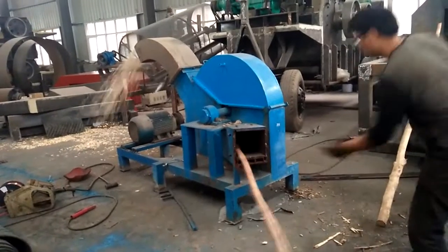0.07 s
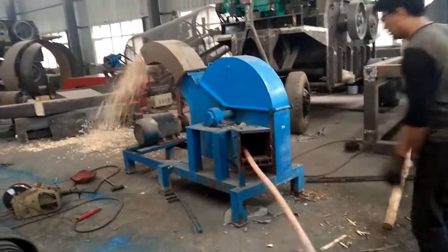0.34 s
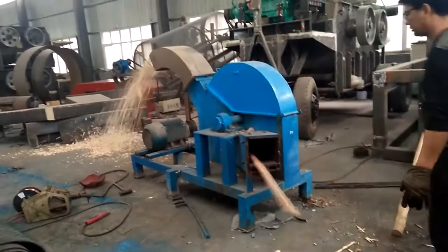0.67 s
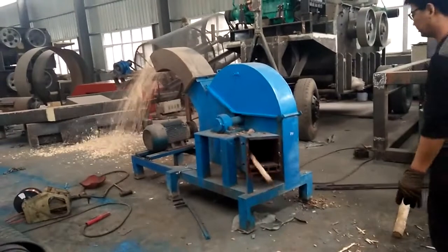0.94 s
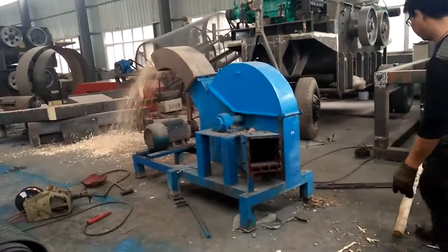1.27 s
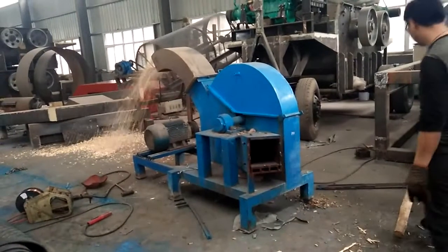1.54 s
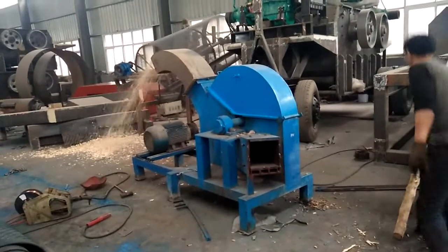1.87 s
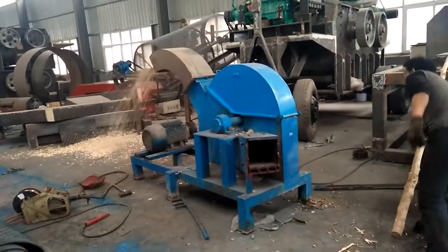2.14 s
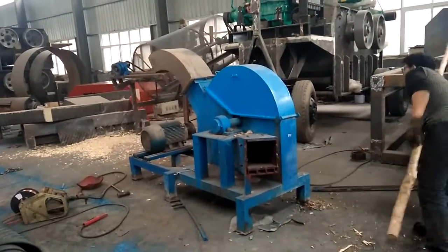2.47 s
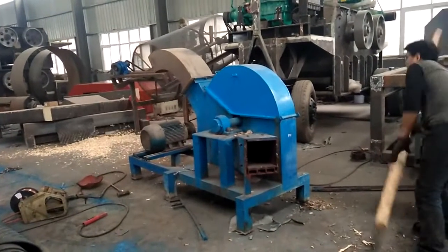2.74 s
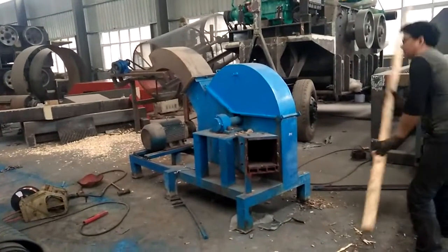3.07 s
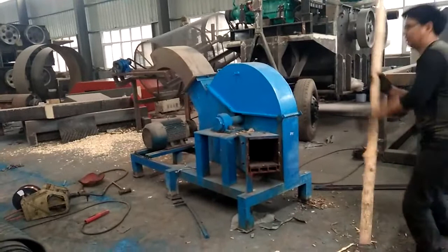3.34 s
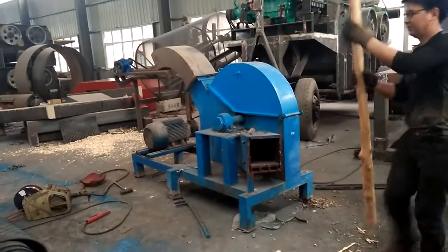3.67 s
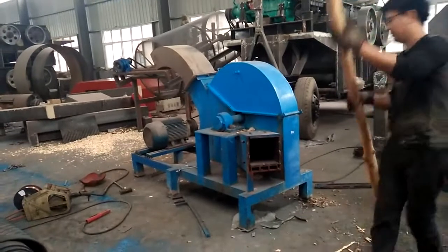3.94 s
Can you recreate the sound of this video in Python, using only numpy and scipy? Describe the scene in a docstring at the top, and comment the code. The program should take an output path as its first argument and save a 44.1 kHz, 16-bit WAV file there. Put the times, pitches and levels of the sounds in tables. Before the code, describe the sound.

A wood chipper roars as it grinds a pole and sprays chips, then runs empty with a quieter hum. Leftover wood clatters, knocks and squeaks against its steel housing, echoing in a large workshop.

```python
"""Wood chipper in a large workshop.

A belt-driven chipper grinds a pole: knives tear off splinters, the housing roars, chips spray out.
It runs empty after 1.7 s and idles with a rotor hum. Twice a leftover piece clatters round the steel
housing; loose chips rattle, wood squeaks, rasps and knocks, and a thin metallic rubbing sets in.
Mono except for the top treble."""
import sys
import numpy as np
from scipy import signal
from scipy.fft import rfft, irfft
from scipy.io import wavfile
from scipy.ndimage import uniform_filter1d, minimum_filter1d

SR = 44100
rng = np.random.default_rng(int(sys.argv[2]) if len(sys.argv) > 2 else 0)


def wav_out(sig):
    """Save sig, one row per channel (or a flat mono array), as 16-bit PCM at SR to the path in sys.argv[1]."""
    wavfile.write(sys.argv[1], SR, np.round(np.clip(np.atleast_2d(sig).T, -1, 1) * 32767).astype(np.int16))


N = 176400
T = np.arange(N) / SR
ROTOR_HZ, KNIVES = 37.93, 2
PANEL_LOW_HZ, PANEL_HIGH_HZ, PANEL_T60_S = 739, 2756, 0.43

# Envelopes. Each row: time in seconds, relative level in dB.
LOAD_ENVELOPE = [(0, -14), (.4, -13.5), (.9, -16), (1.3, -14), (1.68, -13.5), (1.85, -19.5), (2.0, -27),
                 (2.3, -31.5), (2.7, -33), (4, -36)]  # housing roar, standing for rotor load
BITE_ENVELOPE = [(0, -12.5), (.4, -12), (.72, -12), (.95, -16), (1.3, -19.5), (1.62, -21.5), (1.8, -21.5),
                 (2.0, -37), (2.5, -34.5), (4, -71)]  # knives in the pole
SPRAY_ENVELOPE = [(0, -24.5), (.4, -25), (.78, -25.5), (.92, -37.5), (1.04, -26), (1.45, -30),
                  (1.58, -27.5), (1.7, -30), (1.8, -40.5), (2.0, -61), (2.4, -83), (4, -88)]  # chips leaving the chute
STUB_ENVELOPE = [(0, -53), (1.45, -63), (1.66, -18.5), (1.8, -18.5), (1.95, -35), (2.4, -35.5), (2.8, -41),
                 (4, -70)]  # last stub tumbling through the knives
HUM_ENVELOPE = [(0, -15), (.9, -23), (1.55, -12), (2.2, -2.5), (2.7, 3), (3.2, -2.5), (4, -6.5)]  # low rotor harmonics

# Noise spectra. Each row: frequency in Hz, relative density in dB.
ROAR_SPECTRUM = [(30, -26), (80, -25), (160, -15), (230, -44.5), (370, -2), (680, -7.5), (800, 4),
                 (1250, 0.5), (1700, 1.5), (2600, -6.5), (5000, -29), (14000, -78)]
BITE_SPECTRUM = [(100, -38), (170, -7.5), (600, -26.5), (1100, -1), (1800, 1), (2400, 2), (3100, -2),
                 (4300, -6.5), (5200, -14.5), (14000, -48)]
SPRAY_SPECTRUM = [(1000, -1), (4000, -0.5), (5500, -2.5), (8000, 0), (10500, -4), (14000, -6)]
STUB_SPECTRUM = [(200, -49.5), (420, 4.5), (550, -17), (760, -27), (860, 4), (1020, 7), (1150, -11),
                 (3000, -50)]
FAN_SPECTRUM = [(25, -2), (60, -5), (130, 5), (215, -2), (300, -1.5), (600, -0.5), (900, 2), (1500, -7.5),
                (2300, -12), (3800, -16), (5300, -28), (9000, -30), (11000, -39), (14000, -32)]
STRIKE_BODY_SPECTRUM = [(150, -45), (350, 3), (600, -3), (800, 5.5), (1100, 1), (1400, 1.5), (1650, -0.5),
                        (2000, 5), (2550, 3.5), (2850, -4.5), (4000, -6.5), (5000, -13.5), (14000, -39)]
STRIKE_TREBLE_SPECTRUM = [(1500, -55), (4000, -17), (5000, -4.5), (6200, 7), (8700, 3), (10000, -2),
                          (14000, -11)]

# Air resonances of the housing. Each row: frequency in Hz, width in Hz, lift in dB.
CAVITY_RESONANCES = [(296, 52, 18), (382, 54, -11), (447.5, 134, 9), (524, 15, -17), (603.4, 21, 24.5),
                     (626, 35, -23), (749, 25, 7.5), (872, 20, 1.5), (1270, 42, 5.5), (1530, 14, 6.5),
                     (1717, 12, -5), (2986, 44, 6.5)]
# Rotor hum. Each row: multiple of the turn rate, relative level in dB at no load and at full load.
HUM_HARMONICS = [(1, -51, -46), (2, -35, -27), (3, -44, -37), (4, -37, -28.5), (8, -58, -29),
                 (12, -42, -49), (16, -88, -30.5), (20, -43, -30.5)]

# Struck modes. Each row: frequency in Hz, relative level in dB, T60 in seconds.
STEEL_MODES = [(2200, 5, 0.08), (2560, -12, .1), (3020, -9, .1), (4050, -1, 0.08), (4400, -6, 0.08),
               (5850, -2.5, 0.07), (6640, -8, .1), (6770, -1.5, 0.15), (8400, -7, 0.11),
               (10960, -13.5, 0.07)]  # housing
KNOCK_MODES = [(458, -7, 0.076), (754.5, 1.5, 0.17), (785, -1, 0.15), (890, -7.5, 0.42), (1330, -19, 0.07)]  # hollow wood knocks
CHUNK_BOOM_MODES = [(157, -3, 0.12), (242, -35, 0.18), (285.2, 5, 0.25), (411, -8.5, 0.48)]  # big chunks in the housing
RATTLE_MODES = [(776, -7.5, 0.086), (1003, -5, .04), (1330, -7, 0.061), (1710, -3, 0.041),
                (2120, 0.5, 0.023), (2650, -6, 0.017), (3670, -12.5, .03)]  # loose chips

# Leftover wood on the housing. Each row: start in seconds, relative body, treble and ring levels in dB.
HOUSING_STRIKES = [(2.114, -30, -29.5, -54), (2.165, -39, -33.5, -27.5), (2.21, -23.5, -41, -35),
                   (2.317, -33, -60, -57), (3.176, -26, -31.5, -45), (3.2, -18.5, -30.5, -39),
                   (3.262, -15.5, -30.5, -40), (3.295, -24.5, -37, -41), (3.351, -21, -48, -47),
                   (3.489, -32, -42.5, -40)]
# Blows of wood. Each row: start in seconds, relative level in dB.
KNOCK_HITS = [(2.119, -22.5), (2.218, -20), (2.238, -15), (2.34, -24), (2.55, -29), (2.98, -26),
              (3.052, -26), (3.147, -19), (3.225, -16), (3.49, -22), (3.583, -27), (3.625, -23),
              (3.747, -21), (3.876, -26.5)]
BOOM_HITS = [(0.269, -15.5), (0.439, -15), (0.846, -17), (1.129, -18.5), (1.531, -19), (1.823, -19)]
# Wood on steel. Each row: start and length in seconds, start and end pitch in Hz, relative level in dB.
SQUEAK_GLIDES = [(2.35, 0.07, 1696, 2074, -29.5), (2.957, 0.064, 1470, 2070, -41),
                 (3.046, 0.0585, 2200, 2680, -34), (3.179, 0.06, 2287, 2450, -24),
                 (3.325, 0.0592, 2110, 2510, -19.5), (3.58, 0.093, 2296, 2604, -25)]
# Scrapes. Each row: start and length in seconds, start pitch, end pitch and width in Hz, level in dB.
WOOD_RASPS = [(.12, 0.25, 149.8, 174, 55, -27.5), (.55, 0.35, 1393, 1144, 220, -18),
              (.75, 0.091, 2816, 2800, 110, -18), (.86, 0.19, 1260, 1220, 129, -23),
              (1.0, 0.17, 1900, 1720, 170, -19), (1.15, 0.22, 1945, 1560, 220, -23),
              (1.2, 0.24, 800, 847, 110, -26), (1.41, 0.21, 1230, 1221, 130, -21),
              (1.42, 0.092, 3470, 3680, 150, -22), (1.9, 0.054, 2690, 2755, 90, -31),
              (2.13, 0.126, 2300, 2200, 200, -30.5), (2.29, .1, 2940, 3000, 120, -35),
              (2.48, .11, 836, 1024, 69.6, -44), (2.7, .13, 3700, 3780, 100, -48),
              (3.4, .2, 2510, 2604, 250, -29.5)]  # on knives and housing
METAL_RUBS = [(2.65, .6, 6450, 6700, 220, -55), (2.7, 0.66, 8820, 8900, 260, -50.5),
              (2.75, .5, 9900, 10020, 260, -56), (3.2, 0.4, 5800, 5980, 150, -39),
              (3.25, 0.39, 8700, 8830, 300, -45), (3.45, 0.49, 9990, 9920, 240, -48.5),
              (3.65, 0.47, 5680, 5640, 190, -46), (3.72, 0.19, 8720, 8600, 240, -41),
              (3.8, 0.32, 8700, 8800, 360, -48), (3.65, 0.53, 12000, 12100, 1000, -53)]

# Hall decay. Each row: frequency in Hz, T60 in seconds.
HALL_T60 = [(100, 0.88), (1000, 0.89), (2500, 1.76), (5000, 1.34), (9000, 0.81), (14000, 1.04)]


def grinding(turns, chop_db=4.5, roar_db=-3, bite_db=1, spray_db=5, crunch_db=-5):
    """Each knife pass tears off splinters; the housing roars, chips spray, the last stub growls."""
    knife_wave = np.cos(2 * np.pi * KNIVES * turns)
    chop = from_db(chop_db * knife_wave * (-0.5 + 0.5 * drift(61)))
    roar_noise, bite_noise, spray_noise = rng.standard_normal((3, 2, N))
    surge = from_db(1.08 * drift(16.6))
    load = envelope(LOAD_ENVELOPE)
    roar = colour(roar_noise * np.sqrt(chop), ROAR_SPECTRUM, cavity_share=1) * load * from_db(roar_db)
    splinters = grains(per_s=2500, spread_db=3.5) * chop + 1.8 * bite_noise
    bite = colour(splinters, BITE_SPECTRUM, cavity_share=0.65) * envelope(BITE_ENVELOPE)
    chips = grains(per_s=1800, spread_db=5) * chop + 1.4 * spray_noise
    spray = colour(chips, SPRAY_SPECTRUM) * envelope(SPRAY_ENVELOPE)
    spray *= from_db(spray_db + 1.5 * drift(1.7))
    crunch = panel_crunch() * load * from_db(crunch_db)
    growl = colour(rng.standard_normal((2, N)) * chop, STUB_SPECTRUM) * envelope(STUB_ENVELOPE)
    return (roar + bite * from_db(bite_db) + spray + crunch + growl) * surge


def panel_crunch(mode_count=48, hits_per_mode=28, spread_db=4):
    """Chunks hit the sheet-steel panels at random, ringing each mode now and then; rms 1."""
    modes_hz = np.geomspace(PANEL_LOW_HZ, PANEL_HIGH_HZ, mode_count)
    out = 0
    for hz in modes_hz * rng.uniform(0.98, 1.02, mode_count):
        times_s = rng.random(hits_per_mode) * T[-1]
        levels_db = spread_db * np.minimum(rng.exponential(1, hits_per_mode), 3)
        out += ring(clicks(times_s, levels_db), hz, PANEL_T60_S)
    return rms_one(out)


def rotor_hum(turns, waver_db=3, wander_rad=0.092):
    """Harmonics of the turn rate; their balance follows the load."""
    load = envelope(LOAD_ENVELOPE)
    load /= load.max()
    hum = 0
    for order, idle_db, loaded_db in HUM_HARMONICS:
        gain = from_db(idle_db + load * (loaded_db - idle_db) + waver_db * drift(10))
        if order <= 2 * KNIVES:
            gain *= envelope(HUM_ENVELOPE)
        angle_rad = 2 * np.pi * turns + wander_rad * drift(12.3)
        hum += gain * np.sqrt(2) * np.sin(order * angle_rad)
    return hum


def fan_air(level_db=-29.5, flutter_db=2.16):
    """Fan air rushes through the housing."""
    rush = dense_modes(rng.standard_normal((2, N)), ripple_db=7)
    return colour(rush, FAN_SPECTRUM, cavity_share=0.4) * from_db(level_db + flutter_db * drift(39))


def clatter(crack_gain=0.075, crack_s=0.0067, ring_trim_db=-1):
    """Leftover wood hits the steel housing: a crack, ringing modes, a long wash in the hall."""
    times_s, body_db, treble_db, ring_db = np.transpose(HOUSING_STRIKES)
    attack = 1 + crack_gain * np.exp(-T[:2 * SR] / crack_s)
    ringing = struck(times_s, ring_db + ring_trim_db, split_modes(STEEL_MODES), scatter_db=9)
    out = in_hall(ringing, direct_gain=0.28)
    for levels_db, spectrum in ((body_db, STRIKE_BODY_SPECTRUM), (treble_db, STRIKE_TREBLE_SPECTRUM)):
        noise = dense_modes(rng.standard_normal((2, 2 * SR)), ripple_db=4)
        wash = hall_tail(colour(noise, spectrum, cavity_share=0.83))
        out += convolve(clicks(times_s, levels_db), attack * wash)
    return out


def knocks_and_booms(trim_db=-8, band_hz=(230, 1600)):
    """Wood knocks hollowly on the machine; big chunks boom in the housing."""
    knocks = struck(*np.transpose(KNOCK_HITS), KNOCK_MODES, scatter_db=3)
    booms = struck(*np.transpose(BOOM_HITS), CHUNK_BOOM_MODES, scatter_db=2)
    bandpass = signal.butter(2, band_hz, "band", fs=SR, output="sos")
    return in_hall(signal.sosfilt(bandpass, (knocks + booms) * from_db(trim_db)), direct_gain=1.83)


def squeaks(pitch_jitter=0.0263, rough_db=6.5):
    """Wood slides on steel in short, rough, rising tones."""
    out = 0
    for start_s, length_s, start_hz, end_hz, db in SQUEAK_GLIDES:
        progress = np.clip((T - start_s) / length_s, 0, 1)
        hz = (start_hz + (end_hz - start_hz) * progress) * (1 + pitch_jitter * drift(134))
        gain = from_db(db + rough_db * drift(62)) * np.sin(np.pi * progress)
        out += gain * np.sin(2 * np.pi * np.cumsum(hz) / SR)
    return 0.62 * in_hall(out, direct_gain=1.8)


def scrapes(rows, pitch_waver, judder_db, direct_gain):
    """Friction swells and fades in a narrow resonance that slides and wavers."""
    judder = from_db(judder_db * drift(27))
    waver = 1 + pitch_waver * drift(11.37)
    out = 0
    for start_s, length_s, start_hz, end_hz, width_hz, db in rows:
        progress = np.clip((T - start_s) / length_s, 0, 1)
        hz = (start_hz + (end_hz - start_hz) * progress) * waver
        phase_rad = 2 * np.pi * np.cumsum(hz) / SR
        friction = drift(width_hz) * np.cos(phase_rad) + drift(width_hz) * np.sin(phase_rad)
        out += from_db(db) * np.sin(np.pi * progress) * friction
    return rms_one(in_hall(out * judder, direct_gain)) * np.std(out)


def chip_rattle(start_s=1.6, count=34, base_db=-31, spread_db=5):
    """Loose chips tick against the housing at random as the rotor runs empty."""
    times_s = start_s + rng.random(count) * (T[-1] - start_s)
    levels_db = base_db + spread_db * np.minimum(rng.exponential(1, count), 2.5)
    return in_hall(struck(times_s, levels_db, RATTLE_MODES, scatter_db=5), direct_gain=0.65)


def struck(times_s, levels_db, modes, scatter_db):
    """Each blow rings every mode with its own random strength."""
    out = 0
    for hz, mode_db, t60_s in modes:
        hits_db = levels_db + mode_db + scatter_db * rng.standard_normal(len(times_s))
        out += ring(clicks(times_s, hits_db), hz, t60_s)
    return out


def ring(x, hz, t60_s):
    """One mode; a unit click rings at height 1."""
    radius, step_rad = from_db(-60 / (t60_s * SR)), 2 * np.pi * hz / SR
    return signal.lfilter([0, np.sin(step_rad)], [1, -2 * radius * np.cos(step_rad), radius ** 2],
                          x + 1e-18)


def split_modes(modes, count=5, split_hz=85, share_db=-7):
    """Each mode of the welded housing splits into a few close ones."""
    return [(hz + split_hz * offset, db + share_db, t60_s)
            for hz, db, t60_s in modes
            for offset in np.linspace(-1, 1, count) + rng.uniform(-0.12, 0.6, count)]


def dense_modes(noise, ripple_db, spacing_hz=28):
    """Close sheet-steel modes cut a fine random ripple into the spectrum."""
    hz = np.fft.rfftfreq(noise.shape[-1], 1 / SR)
    heights = np.clip(rng.standard_normal(2000), -2, 1.5)
    ripple = np.interp(hz / spacing_hz, np.arange(2000), heights)
    depth = np.clip(hz / PANEL_LOW_HZ - 0.5, 0, 1)
    return irfft(rfft(noise) * from_db(ripple_db * ripple * depth), noise.shape[-1])


def colour(noise, spectrum, cavity_share=0):
    """Shape noise by a spectrum and a share of the housing's air resonances; rms 1."""
    hz = np.fft.rfftfreq(noise.shape[-1], 1 / SR)
    cavity_db = sum(lift_db / (1 + (2 * (hz - centre_hz) / width_hz) ** 2)
                    for centre_hz, width_hz, lift_db in CAVITY_RESONANCES)
    gain = from_db(at_hz(spectrum, hz) + cavity_share * cavity_db)
    return rms_one(irfft(rfft(noise) * gain, noise.shape[-1]))


def in_hall(source, direct_gain):
    """Direct sound in the mid channel plus a unit-energy hall tail in mid and side."""
    tail = hall_tail(rng.standard_normal((2, 2 * SR)))
    tail /= np.sqrt(np.sum(tail[0] ** 2))
    return direct_gain * source * [[1], [0]] + convolve(source, tail)


def hall_tail(noise):
    """Noise dies away, each octave at the hall's rate."""
    n = noise.shape[-1]
    hz, spectrum = np.fft.rfftfreq(n, 1 / SR), rfft(noise)
    out = 0
    for low_hz in 40 * 2 ** np.arange(9):
        octave = irfft(spectrum * (hz >= low_hz) * (hz < 2 * low_hz), n)
        out += octave * from_db(-60 * T[:n] / at_hz(HALL_T60, low_hz * np.sqrt(2)))
    return out


def convolve(x, response):
    """Pass a sound through a mid/side response."""
    return signal.fftconvolve(np.atleast_2d(x), response, axes=1)[:, :N]


def grains(per_s, spread_db):
    """Random clicks of uneven size in mid and side; rms 1."""
    sizes = from_db(spread_db * np.minimum(rng.exponential(1, (2, N)), 4))
    hits = rng.random((2, N)) < per_s / SR
    return rms_one(hits * sizes * rng.choice([-1, 1], (2, N)))


def clicks(times_s, levels_db):
    """One impulse per blow."""
    out = np.zeros(N)
    out[(times_s * SR).astype(int)] = from_db(levels_db)
    return out


def drift(corner_hz, hop=20):
    """Low-passed random motion; rms about 1."""
    hz = np.fft.rfftfreq(N // hop, hop / SR)
    spectrum = rfft(rng.standard_normal(N // hop)) * (hz > 0) / (1 + (hz / corner_hz) ** 2)
    return np.interp(T, T[::hop], rms_one(irfft(spectrum, N // hop)))


def envelope(rows):
    """Gain over time from rows of seconds and dB."""
    return from_db(np.interp(T, *np.transpose(rows)))


def at_hz(rows, hz):
    """Read a table on a log-frequency axis."""
    row_hz, values = np.transpose(rows)
    return np.interp(np.log(hz + 1), np.log(row_hz), values)


def from_db(db):
    """Decibels to gain."""
    return 10 ** (np.asarray(db) / 20)


def rms_one(x):
    """Scale to rms 1."""
    return x / np.sqrt(np.mean(x ** 2) + 1e-20)


def scene(speed_wander=0.0039, width=0.72, wide_above_hz=5600):
    """Sum the sources as mid and side, keep only treble in the side, return left and right."""
    turns = np.cumsum(ROTOR_HZ * (1 + speed_wander * drift(1.98))) / SR
    rasps = scrapes(WOOD_RASPS, pitch_waver=0.01014, judder_db=1.8, direct_gain=2.25)
    rubs = scrapes(METAL_RUBS, pitch_waver=0.0039, judder_db=3, direct_gain=1)
    machine = grinding(turns) + rotor_hum(turns) + fan_air()
    mid, side = machine + clatter() + knocks_and_booms() + squeaks() + chip_rattle() + rasps + rubs
    highpass = signal.ellip(8, 0.5, 80, wide_above_hz, "high", fs=SR, output="sos")
    side = width * signal.sosfilt(highpass, side)
    return np.array([mid + side, mid - side])


def record(dry, rumble_hz=18, ceiling=0.95, limiter_samples=121, cutoff_hz=14400):
    """Rumble filter, fast peak limiter, steep low-pass."""
    x = signal.sosfilt(signal.butter(2, rumble_hz, "high", fs=SR, output="sos"), dry)
    gain = np.minimum(1, ceiling / (np.abs(x).max(axis=0) + 1e-9))
    x *= uniform_filter1d(minimum_filter1d(gain, limiter_samples), limiter_samples)
    return signal.sosfiltfilt(signal.ellip(12, 0.05, 60, cutoff_hz, fs=SR, output="sos"), x)


dry = scene()
out = record(dry)
wav_out(out)
```